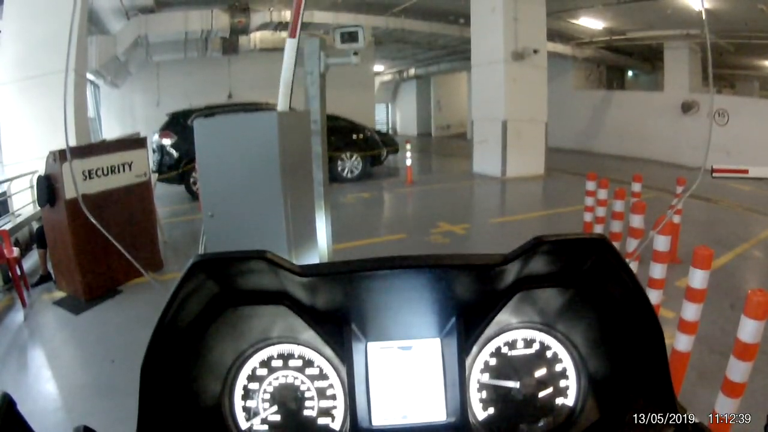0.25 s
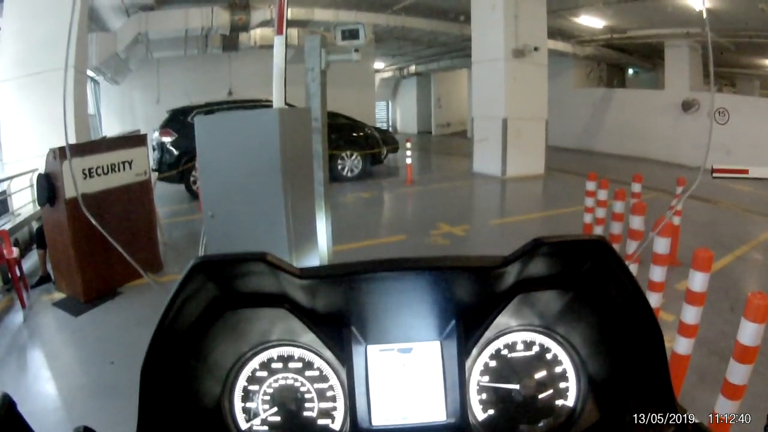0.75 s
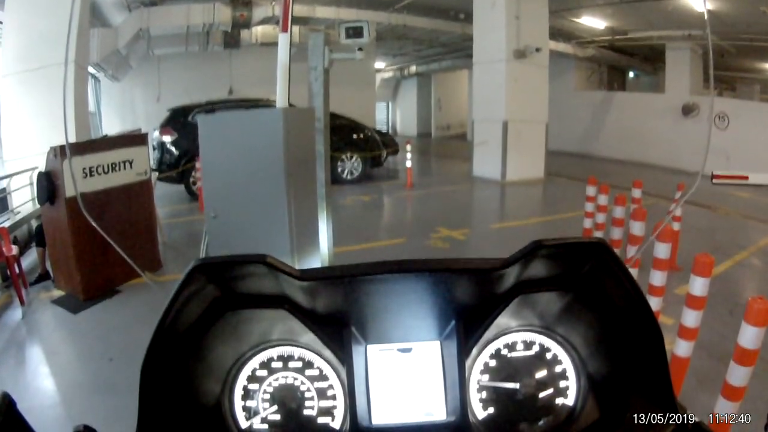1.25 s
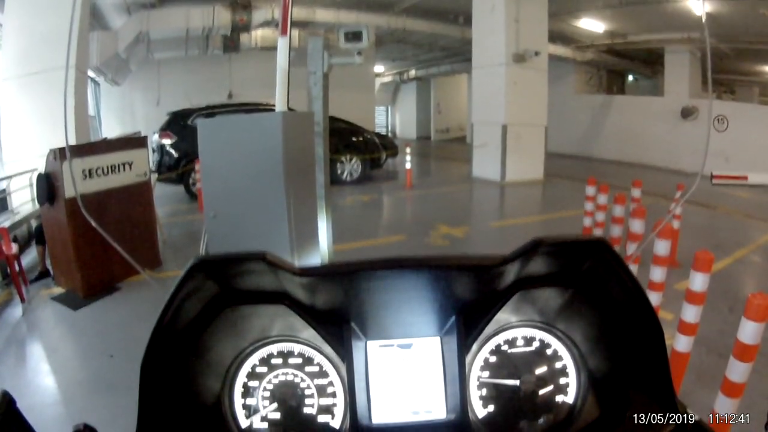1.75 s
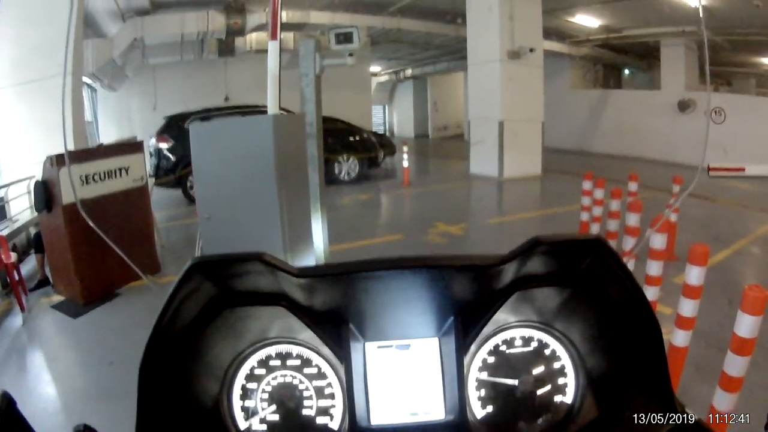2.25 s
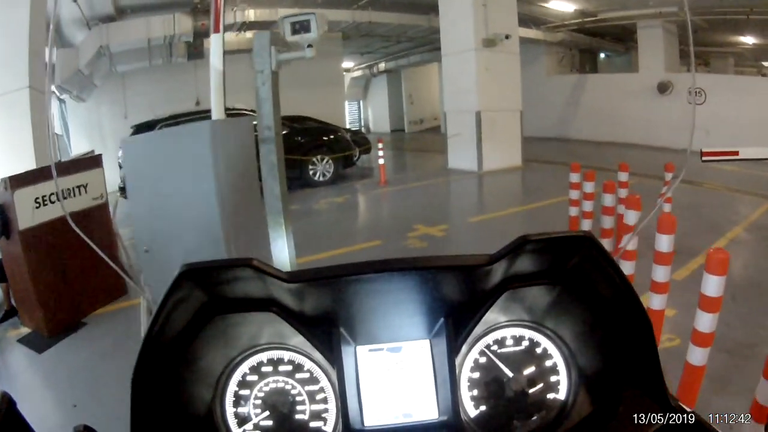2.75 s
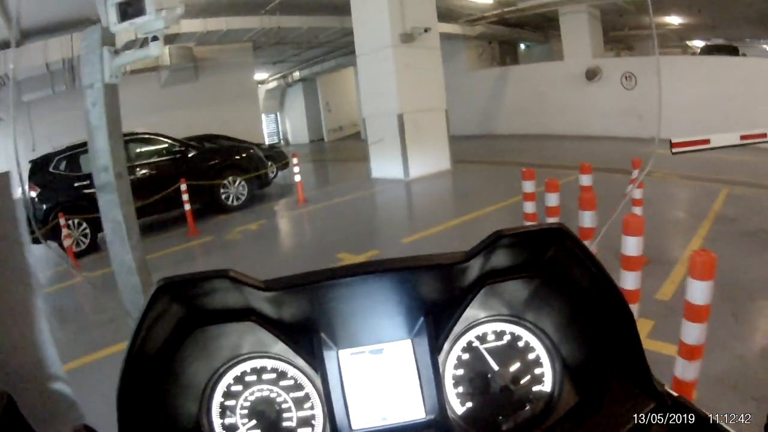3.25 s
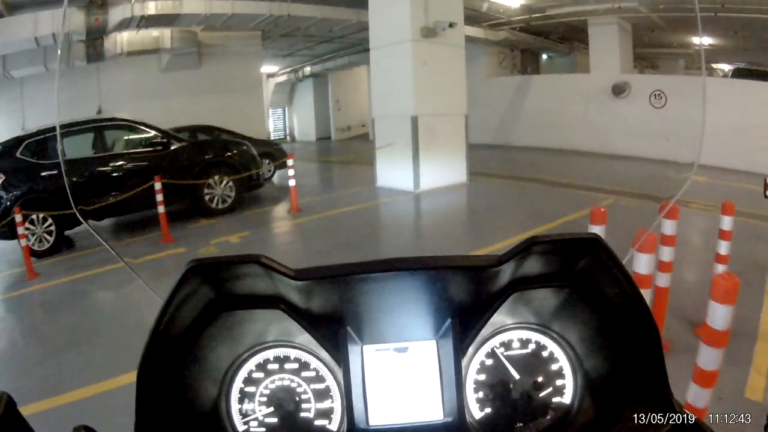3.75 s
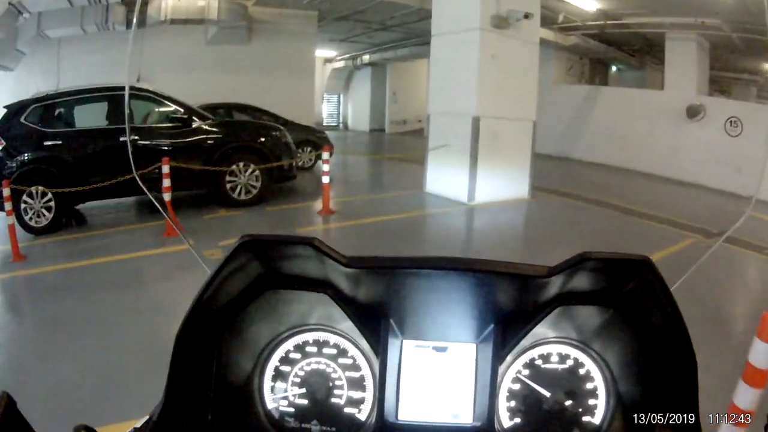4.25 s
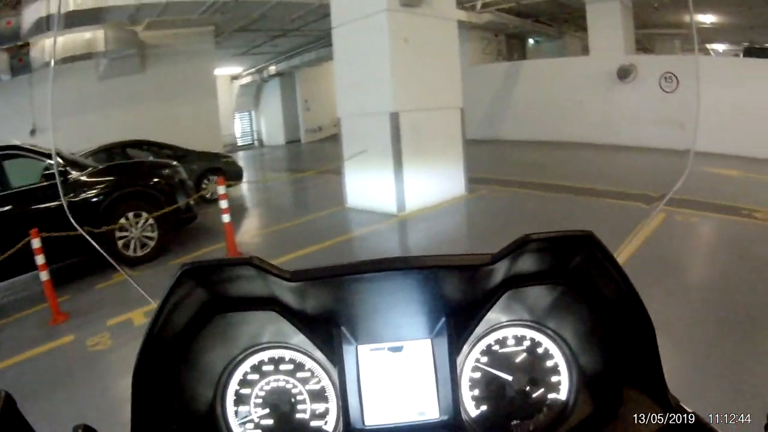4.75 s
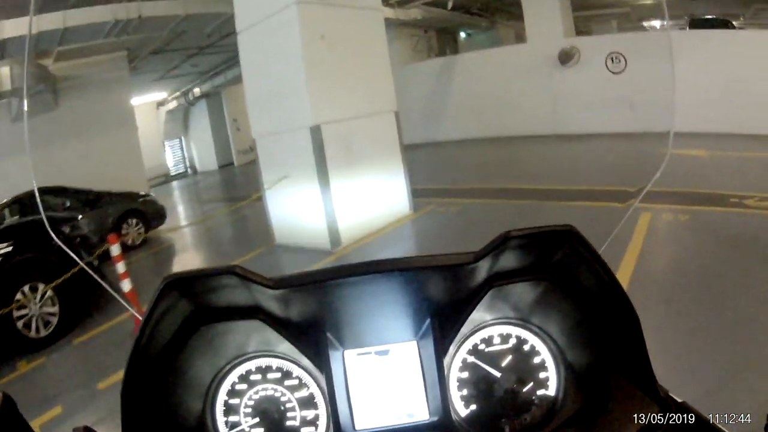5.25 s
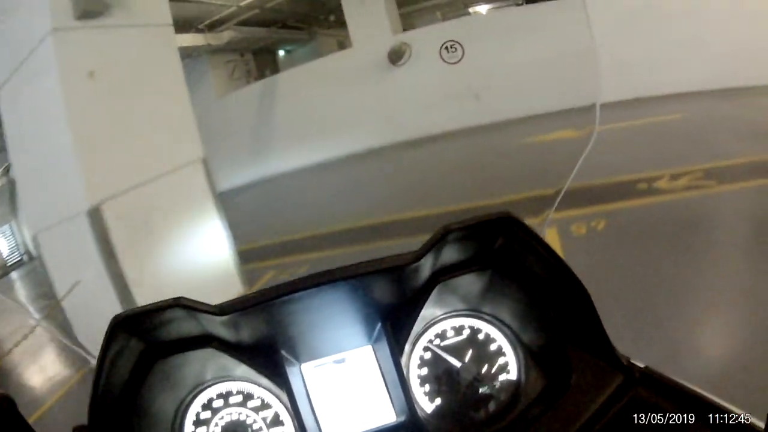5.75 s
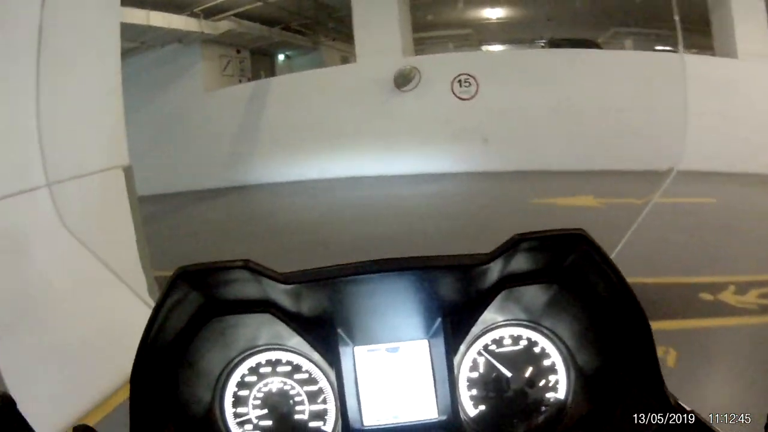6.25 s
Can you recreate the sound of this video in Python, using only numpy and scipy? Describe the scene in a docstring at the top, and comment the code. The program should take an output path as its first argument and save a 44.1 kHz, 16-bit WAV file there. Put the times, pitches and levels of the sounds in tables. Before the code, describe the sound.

Heard from the rider's position, a scooter putters low and bassy in an enclosed concrete garage. A faint motor hum fades, one loud clack strikes, then snapping and clutch chatter lead into a raspy intake drone. The throttle shuts; bumps, rattling trim and tyre rumble continue. A quick fluttering squeal of brakes precedes another brief pull, and the engine slows to coast at the end.

```python
"""An idling motor scooter throbs at a barrier in a concrete car park while the barrier's motor hums and fades.
The scooter pulls away, coasts with a short beating brake squeal, picks up again and ends coasting.
Throb and thumps follow tables of engine speed and strength; the intake is a set of firing harmonics with noise bursts.
Damped modes make the knocks of the plastic fairing, sliding sines the brake squeal and shaped noise the tyres,
belt and clatter; the hall answers with a dull tail of decaying noise over a faint hiss."""
import sys
import numpy as np
from scipy import signal
from scipy.fft import rfft, irfft, next_fast_len
from scipy.io import wavfile
from scipy.ndimage import map_coordinates

SR = 44100
rng = np.random.default_rng(int(sys.argv[2]) if len(sys.argv) > 2 else 0)


def digitize_waveform(pressure):
    """Quantize a signal to 16-bit integers and store it at the path in sys.argv[1].

    Rows of a 2-D input are taken as channels; values are limited to [-1, 1].
    """
    field = np.atleast_2d(pressure).T
    bounded = np.clip(field, -1, 1)
    quanta = np.round(bounded * 32767).astype(np.int16)
    wavfile.write(sys.argv[1], SR, quanta)


N = 286650


def amp(db):
    """Decibels to gain."""
    return 10 ** (np.asarray(db) / 20)


def unit(x):
    """Scale to rms 1."""
    return x / np.sqrt(np.mean(x ** 2) + 1e-20)


def along(points, hz):
    """Read a table of frequency and value on a log frequency axis."""
    f, v = np.transpose(points)
    return np.interp(np.log(hz + 1), np.log(f + 1), v)


def curves(rows):
    """One value per sample for each column after the time."""
    s, *cols = np.transpose(rows)
    return [np.interp(np.arange(N) / SR, s, c) for c in cols]


def wobble(rate):
    """A smooth random curve, rate knots a second."""
    knots = rng.standard_normal(int(N * rate / SR) + 4)
    return map_coordinates(knots, [np.arange(N) * rate / SR])


def swell(s, rise, fall):
    """A rounded rise to 1 at time s, then an exponential fall."""
    t = np.arange(N) / SR - s
    return np.exp(-(np.minimum(t, 0) / rise) ** 2 - np.maximum(t, 0) / fall)


def response(points, size=8192):
    """Causal (minimum-phase) impulse response with the given spectrum."""
    gains = amp(along(points, np.fft.rfftfreq(size, 1 / SR)))
    cepstrum = irfft(np.log(gains))
    cepstrum[1:size // 2] *= 2
    cepstrum[size // 2 + 1:] = 0
    return irfft(np.exp(rfft(cepstrum)))


def colour(x, points):
    """Pass x through a body with the given spectrum."""
    return signal.fftconvolve(x, response(points))[:len(x)]


def noise(points):
    """Coloured noise of rms 1."""
    return unit(colour(rng.standard_normal(N), points))


def grains(points, per_s, scatter_db):
    """Tiny contacts at random moments, coloured by a body; rms 1."""
    moments = rng.random(N) < per_s / SR
    signs = rng.choice([-1, 1], N)
    strengths = amp(scatter_db * np.clip(rng.standard_normal(N), -2, 2))
    return unit(colour(moments * signs * strengths, points))


def pulses(turns, scatter_db, alternate_db):
    """One impulse at each whole turn, alternately raised and lowered by alternate_db."""
    at = np.flatnonzero(np.diff(np.floor(turns)) > 0)
    alternation = alternate_db * (-1) ** np.arange(len(at))
    train = np.zeros(N)
    train[at] = amp(scatter_db * rng.standard_normal(len(at)) + alternation)
    return train


def struck(train, points):
    """Each impulse becomes a short pulse of the same height."""
    shape = response(points)
    return signal.fftconvolve(train, shape / np.abs(shape).max())[:N]


def gate(turns, lag, depth_db):
    """A swell once per firing; rms 1."""
    return unit(amp(depth_db * np.cos(2 * np.pi * (turns - lag))))


# Engine speed. Each row: time in seconds, firings per second.
ENGINE_SPEED = [(0.0, 28.352), (0.46, 28.571), (0.72, 27.336), (0.98, 28.833), (1.28, 27.2), (1.44, 27.447),
                (1.78, 29.948), (1.95, 28.986), (2.15, 32.0), (2.25, 27.194), (2.5, 34.6), (3.25, 33.065),
                (3.52, 29.6), (3.68, 21.8), (3.85, 19.3), (4.1, 19.0), (4.3, 22.1), (4.55, 23.6),
                (4.9, 24.4), (5.04, 26.2), (5.21, 30.79), (5.62, 29.746), (5.85, 29.973), (6.0, 24.5),
                (6.2, 21.5), (6.5, 19.3)]


def firing_rate():
    """Firings per second at every sample."""
    return curves(ENGINE_SPEED)[0]


# Intake loudness, which also stands for the throttle. Each row: time in seconds, level in dB.
INTAKE_LEVEL = [(0, -70), (1.55, -67), (2.05, -46), (2.3, -38), (2.48, -34.5), (3.25, -35.5), (3.65, -46.5),
                (4.9, -52), (5.25, -44), (5.8, -49.5), (6.5, -50)]
FULL_INTAKE_DB = -35  # counted as full throttle


def intake_db():
    """Intake level at every sample."""
    return curves(INTAKE_LEVEL)[0]


def effort_db():
    """Intake level relative to full throttle."""
    return intake_db() - FULL_INTAKE_DB


# Road speed. Each row: time in seconds, speed, where about 1 is the fastest.
ROAD_SPEED = [(2.05, 0), (3.3, 0.58), (4.7, 0.79), (5.6, 1.07), (6.5, 0.27)]


def road_speed():
    """Relative road speed at every sample."""
    return curves(ROAD_SPEED)[0]


# Strength of the firing thumps. Each row: time in seconds, peak in dB before scatter and stumbles.
THUMP_LEVEL = [(0, -23.5), (.5, -26.5), (.75, -28), (1.2, -30), (1.8, -16.5), (2.08, -15), (2.13, -21.5),
               (2.35, -20.5), (2.5, -43), (3.27, -40.5), (3.33, -27), (3.4, -24.5), (3.58, -49),
               (5.35, -53), (5.7, -20), (5.82, -21), (5.91, -44)]
# Shut throttle. Each row: time in seconds, degree of coasting from 0 to 1.
COASTING = [(3.52, 0.14), (3.66, 0.72), (5.08, 1), (5.17, 0), (5.85, 0.32), (5.95, 0.83)]
# The beat falters briefly. Each row: time in seconds, half length in seconds, thump change in dB,
# throb change in dB.
STUMBLES = [(0.4, 0.033, -12.5, 0), (2.142, 0.033, -8.5, -5.5), (2.54, 0.051, -1, -11),
            (3.042, 0.054, 1.5, -4.5), (3.3, 0.067, -5.5, -1), (5.292, 0.026, 0.5, -3)]
# Exhaust puff of a thump. Each row: frequency in Hz, level in dB.
PUFF_SPECTRUM = [(20, -27), (70, -4.5), (130, -0.5), (250, 3), (370, 1), (470, -3.5), (580, -24.5),
                 (760, -16.5), (1000, -30.5), (1500, -49.5), (3000, -67), (8000, -95.5)]
# Hard edge of a firing. Each row: frequency in Hz, level in dB.
SLAP_SPECTRUM = [(200, -32), (550, -6.5), (800, 4), (1050, -5), (1400, -24), (3000, -58)]
IDLE_THUMP_DB = -28
# a "grows" setting is dB per dB of thump above idle
BOOM_HZ, BOOM_WIDTH_HZ = 29.9, 2.37  # the throb is strongest near this firing rate
THROB_DB, THROB_GROWS, THROB_COAST_DB = -19.5, 0.2, -12  # at the boom; growth; change when coasting
THROB_WAVER_DB, COAST_WAVER_DB = .6, 1.5  # unsteadiness; extra when coasting
OCTAVE_DB, OCTAVE_GROWS, OCTAVE_FULL_DB = -45, 0.51, -42  # at idle; growth; part that follows throttle
# coasting, the octave swells as it sinks to the frame's resonance
OCTAVE_PEAK_HZ, OCTAVE_WIDTH_HZ, OCTAVE_COAST_DB = 35, 4.5, -31
THIRD_COAST_DB = -57  # third harmonic when coasting
JITTER_TURNS = 0.0091  # firings come slightly early or late
REBOUND_DB = -15  # a weaker opposite thump about half a cycle after each firing
SLAP_DB, SLAP_GROWS = -51.5, 1.56  # at idle; growth


def exhaust(turns):
    """The silencer leaves a deep throb, booming near one rate, with a suction thump before each trough."""
    rate, thump_db, coasting = firing_rate(), curves(THUMP_LEVEL)[0], curves(COASTING)[0]
    waver_db = (THROB_WAVER_DB + COAST_WAVER_DB * coasting) * wobble(9)
    for s, half, thump_change_db, throb_change_db in STUMBLES:
        stumble = np.exp(-((np.arange(N) / SR - s) / half) ** 4)
        thump_db = thump_db + thump_change_db * stumble
        waver_db = waver_db + throb_change_db * stumble
    load_db = thump_db - IDLE_THUMP_DB

    boom = 1 / np.hypot(1, (rate - BOOM_HZ) / BOOM_WIDTH_HZ)
    first = boom * amp(THROB_DB + THROB_GROWS * load_db + THROB_COAST_DB * coasting + waver_db)
    resonance = 1 / np.hypot(1, (2 * rate - OCTAVE_PEAK_HZ) / OCTAVE_WIDTH_HZ)
    second = amp(OCTAVE_DB + OCTAVE_GROWS * load_db)
    second = second + coasting * amp(OCTAVE_COAST_DB + waver_db) * resonance
    second = np.hypot(second, amp(OCTAVE_FULL_DB + effort_db()))
    third = coasting * amp(THIRD_COAST_DB + COAST_WAVER_DB * wobble(7.1))
    angle = 2 * np.pi * turns
    throb = second * np.cos(2 * angle + 0.62) - first * np.cos(angle - .63) + third * np.cos(3 * angle)
    throb = np.sqrt(2) * throb

    firings = pulses(turns + .05 + JITTER_TURNS * wobble(25), scatter_db=1.0, alternate_db=0)
    rebounds = pulses(turns - .41, scatter_db=0.0, alternate_db=3)
    thump = amp(thump_db) * struck(amp(REBOUND_DB) * rebounds - firings, PUFF_SPECTRUM)
    slap = amp(SLAP_DB + SLAP_GROWS * load_db) * struck(firings, SLAP_SPECTRUM)
    return throb + thump - slap + amp(-19.5) * hall(thump)


# Airbox resonances. Each row: frequency in Hz, level in dB.
AIRBOX = [(34, -29.5), (68, -9.5), (102, -7.5), (136, 1.5), (170, 2.5), (204, -5.5), (238, 3.5), (272, 2),
          (340, -9.5), (470, 1.5), (560, -5.5), (660, -11.5), (780, -25), (950, -10), (1080, -7.5),
          (1250, -7.5), (1500, -21), (2400, -36)]
# Noise of the rushing air. Each row: frequency in Hz, level in dB.
RASP_SPECTRUM = [(200, -34.5), (480, 3.5), (640, -4), (800, -12), (1050, 5), (1230, 0.5), (1500, -10),
                 (1850, -7.5), (2300, -21), (2800, -27.5), (3500, -24), (5000, -37), (7000, -38.5),
                 (8000, -59)]
RASP_FROM_HZ, RASP_DB = 850, -15  # harmonics above this swell with each gulp; rasp against the drone
GULP_RISE_S, GULP_FLOOR, GULP_SCATTER_TURNS = .004, .65, .02
INTAKE_ECHO = .2  # share of the roar that comes back from the concrete


def gulps(turns, lag, scatter_db):
    """A burst per firing that rises fast and dies away, each of its own strength; rms 1."""
    u = np.arange(SR // 20) / SR / GULP_RISE_S
    bursts = signal.fftconvolve(pulses(turns - lag, scatter_db, alternate_db=-6), u * np.exp(1 - u))[:N]
    return unit(GULP_FLOOR + bursts)


def intake(turns, count=44):
    """Fixed airbox resonances pick out harmonics of the firing rate; each gulp of air barks and rasps."""
    rate, drone = firing_rate(), np.zeros(N)
    gulp = gulps(turns + GULP_SCATTER_TURNS * wobble(30), lag=-.02, scatter_db=3.3)
    for k in range(3, count):
        upper = k * rate.max() > RASP_FROM_HZ
        # reflections spread each gulp over the cycle
        smear = 2 * rng.standard_normal() + (.35 * wobble(8) if upper else .06 * wobble(5))
        level = amp(along(AIRBOX, k * rate) + 0.91 * wobble(4.05))
        line = level * np.cos(2 * np.pi * k * turns + smear)
        drone += line * (gulp if upper else 1)
    rasp = amp(RASP_DB) * noise(RASP_SPECTRUM) * gulp * amp(2.5 * wobble(110))
    roar = unit(drone) + rasp
    return amp(intake_db()) * unit(roar + INTAKE_ECHO * hall(roar))


# Tappet patter. Each row: frequency in Hz, level in dB.
TAPPET_SPECTRUM = [(1200, -43), (2000, 5), (2350, -8.5), (2650, -24), (3300, -26.5), (4100, -22),
                   (5000, -22), (9000, -55.5)]
# Dry valve tick. Each row: frequency in Hz, level in dB.
TICK_SPECTRUM = [(100, -35), (400, 13.5), (900, 14), (1400, -18.5), (2000, 7.5), (2700, -8.5), (3400, -10),
                 (4500, -29), (7000, -42.5), (8500, -56.5)]
# Spells of ticks under load. Each row: start in seconds, end in seconds, peak in dB before scatter.
TICK_SPELLS = [(1.74, 1.835, -31.5), (1.84, 2.105, -26.5)]
TAPPET_DB, TAPPET_GROWS = -64.5, 0.37  # at full throttle; dB per dB of intake


def valves(turns):
    """Tappets patter once a cycle, louder with the throttle; dry ticks join as the drive takes up load."""
    level = amp(TAPPET_DB + TAPPET_GROWS * effort_db())
    patter = level * noise(TAPPET_SPECTRUM) * gate(turns, lag=0.57, depth_db=3.5)
    t = np.arange(N) / SR
    strength = sum(amp(db) * ((t > start) & (t < end)) for start, end, db in TICK_SPELLS)
    ticks = pulses(turns - .42, scatter_db=.5, alternate_db=.6)
    return patter + struck(strength * ticks, TICK_SPECTRUM)


CAM_HZ, CAM_RING_S, CAM_DB = 2304, 0.054, -59.5  # pitch; t60; level before scatter


def cam(turns):
    """A light metal tick that rings briefly on every second firing."""
    t = np.arange(SR // 8) / SR
    ring = amp(-60 * t / CAM_RING_S) * np.sin(2 * np.pi * CAM_HZ * t)
    strikes = pulses(turns / 2 - .15, scatter_db=1.5, alternate_db=0.0)
    return amp(CAM_DB) * signal.fftconvolve(strikes, ring)[:N]


# The clutch biting. Each row: frequency in Hz, level in dB.
CLUTCH_SPECTRUM = [(1200, -25.5), (1600, -13), (1870, 6.5), (2100, -13), (2350, -2), (2700, -25.5),
                   (5000, -53), (8000, -74)]
CHATTER_AT_S, CHATTER_RISE_S, CHATTER_FALL_S, CHATTER_DB = 2.36, .08, 0.28, -49


def clutch(turns):
    """The clutch shoes chatter as they bite: a clump of hard grains in each cycle."""
    clumps = grains(CLUTCH_SPECTRUM, per_s=600, scatter_db=3) * gate(turns, lag=.35, depth_db=7)
    clumps = clumps * amp(2.5 * wobble(35))
    return amp(CHATTER_DB) * swell(CHATTER_AT_S, CHATTER_RISE_S, CHATTER_FALL_S) * clumps


# Body shaken through the drive. Each row: frequency in Hz, level in dB.
BODY_RESONANCES = [(60, -30.5), (88, 0), (105, -18), (150, -14.5), (170, -2), (192, 0.5), (218, -2.5),
                   (250, -12.5), (320, -15.5), (400, -27.5)]
HUM_DB = -42  # peak of a line on a 0 dB resonance at road speed 1


def drive_hum(turns, count=18):
    """On the move, the drive carries engine harmonics into the body; they slide through its resonances."""
    rate, lines = firing_rate(), np.zeros(N)
    for k in range(3, count):
        angle = 2 * np.pi * (k * turns + rng.random()) + .2 * wobble(6)
        lines += amp(along(BODY_RESONANCES, k * rate)) * np.cos(angle)
    return amp(HUM_DB) * road_speed() ** 2 * lines


# Tyre rumble on the deck. Each row: frequency in Hz, level in dB.
DECK_SPECTRUM = [(20, -20.5), (50, -3.5), (110, -7.5), (190, 2.5), (240, -6), (330, -16), (480, -16),
                 (800, -31.5), (2000, -74.5)]
# Shudder of the frame. Each row: frequency in Hz, level in dB.
FRAME_SPECTRUM = [(15, -23), (25, -8), (34, 4), (42, -3.5), (55, -19.5), (100, -26), (300, -87.5)]
# Rub of belt and brake. Each row: frequency in Hz, level in dB.
RUB_SPECTRUM = [(1000, -38), (1550, -13.5), (1880, 7), (2100, 0.5), (2350, 1), (2650, -21.5), (3100, -19),
                (3330, 5.5), (3600, 0.5), (3850, -17), (4100, -15.5), (4330, -10.5), (4650, -28.5),
                (7500, -40.5), (8200, -63.5)]
# Clatter of engine and drive. Each row: frequency in Hz, level in dB.
CLATTER_SPECTRUM = [(120, -11), (300, 5), (400, -5.5), (520, 0), (580, -7), (660, 4.5), (820, -19.5),
                    (930, -6), (1320, -3), (1560, -15.5), (2250, -18.5), (2600, -42.5), (4000, -30),
                    (7000, -69.5)]
# Jolts through the frame. Each row: time in seconds, half length in seconds, rumble in dB, shudder in dB.
JOLTS = [(0.542, 0.039, -31, -54), (2.211, 0.056, -28.5, -29.5), (2.365, 0.07, -32.5, -40.5),
         (3.4, 0.069, -34.5, -48), (3.865, 0.021, -31.5, -35), (4.136, 0.023, -31.5, -34),
         (5.117, 0.048, -37.5, -52)]
# Clutch and brake rubs. Each row: time in seconds, rise in seconds, fall in seconds, rub in dB,
# clatter in dB.
RUBS = [(2.31, 0.15, 0.32, -55, -41), (4.03, 0.078, 0.18, -55.5, -45.5), (4.155, 0.027, 0.04, -48, -41),
        (5.02, 0.26, 0.24, -61, -44.5), (5.42, 0.09, 0.034, -62, -47.5)]
# levels at rest, then levels added at road speed 1
DECK_STANDING_DB, DECK_ROLLING_DB = -47.5, -41
FRAME_STANDING_DB, FRAME_ROLLING_DB = -47.5, -47
BELT_STANDING_DB, BELT_ROLLING_DB = -75, -77
# engine clatter at full throttle; dB per dB of intake; drive clatter added at road speed 1
CLATTER_DB, CLATTER_GROWS, CLATTER_ROLLING_DB = -46, 0.22, -52.5


def rolling(standing_db, rolling_db):
    """A standing gain joined in power by one that grows with the square of road speed."""
    return np.hypot(amp(standing_db), amp(rolling_db) * road_speed() ** 2)


def running(turns):
    """Tyres and frame rumble with speed and jolts; the belt hisses, rubs and clatter pulse in each cycle."""
    deck = rolling(DECK_STANDING_DB, DECK_ROLLING_DB)
    frame = rolling(FRAME_STANDING_DB, FRAME_ROLLING_DB)
    belt = rolling(BELT_STANDING_DB, BELT_ROLLING_DB)
    clatter = rolling(CLATTER_DB + CLATTER_GROWS * effort_db(), CLATTER_ROLLING_DB)
    rub = 0
    for s, half, rumble_db, shudder_db in JOLTS:
        jolt = swell(s, half, half)
        deck = np.hypot(deck, amp(rumble_db) * jolt)
        frame = np.hypot(frame, amp(shudder_db) * jolt)
    for s, rise, fall, rub_db, clatter_db in RUBS:
        grip = swell(s, rise, fall)
        rub = np.hypot(rub, amp(rub_db) * grip)
        clatter = np.hypot(clatter, amp(clatter_db) * grip)
    rumble = deck * amp(2.1 * wobble(14)) * noise(DECK_SPECTRUM)
    shudder = frame * noise(FRAME_SPECTRUM)
    grit = grains(RUB_SPECTRUM, per_s=1400, scatter_db=3) * gate(turns, lag=.28, depth_db=7)
    clank = noise(CLATTER_SPECTRUM) * gate(turns, lag=0.071, depth_db=-0.5) * amp(2.5 * wobble(70) - 0.8)
    return rumble + shudder + belt * noise(RUB_SPECTRUM) + rub * grit + clatter * clank


# Loose trim. Each row: frequency in Hz, level in dB.
TRIM_SPECTRUM = [(400, -26.5), (900, -6.5), (1080, -7), (1320, 6.5), (1550, -11), (2200, -17.5),
                 (2700, -38.5), (3450, -21.5), (5000, -43), (8000, -64.5)]
TRIM_DB = -54.5  # at road speed 1


def trim(turns):
    """Loose trim rattles on the move, shaken by each firing."""
    shaken = grains(TRIM_SPECTRUM, per_s=170, scatter_db=3) * gate(turns, lag=.2, depth_db=5)
    return amp(TRIM_DB) * road_speed() * shaken


# The frame rocks on its mounts. Each row: time in seconds, half length in seconds, pitch in Hz, level in dB.
JUDDERS = [(3.715, 0.066, 30.9, -31.5), (3.952, 0.042, 25.7, -25.5), (4.105, 0.044, 27.6, -34),
           (4.855, 0.038, 28.8, -28.5)]


def judder():
    """A few slow cycles of the frame rocking on its mounts."""
    t, out = np.arange(N) / SR, np.zeros(N)
    for s, half, hz, db in JUDDERS:
        out += amp(db) * swell(s, half, half) * np.cos(2 * np.pi * hz * (t - s))
    return np.sqrt(2) * out


# Fairing knocks. Each row: time in seconds, thud in dB, clack in dB, crack in dB, tick in dB,
# hard edge in dB relative to the tick. These tilt the spectrum of the ring and rattle.
KNOCKS = [(.467, -57, -35, -37.5, -57, 5), (.506, -64, -32.5, -40, -45, 24),
          (.5085, -53, -29, -37, -47.5, 13.5), (.5155, -56, -28.5, -32.5, -50, 11),
          (0.52, -44, -36, -31, -47, 17), (0.5249, -14.5, -33, -33.5, -45.5, 14),
          (1.664, -55, -39, -40.5, -58, -8), (1.694, -49, -43.5, -34, -22, 0.5),
          (1.7164, -4, -12.5, -16, -10, -5), (1.7245, -16, -14, -25, -19.5, 1),
          (1.7288, -13, -15.5, -22, -22.5, -11), (1.735, -26.5, -21, -28.5, -36, 2),
          (2.209, -39, -29.5, -31, -55, 6), (2.2449, -41.5, -28, -26, -45, 6),
          (3.6491, -40, -35, -56, -58, -8), (3.851, -27, -42, -47, -47, 1),
          (3.886, -30, -37.5, -42, -33, -2), (3.916, -17, -40.5, -46, -45, 10),
          (4.115, -12.5, -32, -29, -42.5, 4.5), (4.137, -20, -39, -44, -32, -14),
          (4.149, -30.5, -34, -30, -34, -12), (4.25, -55, -30.5, -31, -32.5, 7),
          (4.255, -56, -32.5, -22.5, -40.5, 19.5), (4.838, -50, -35, -38, -54.5, -3.5),
          (5.075, -13.5, -33.5, -37, -42, 12), (5.295, -48, -34.5, -25, -32.5, 9),
          (5.544, -13.5, -41, -54, -62, -8), (5.636, -49, -34.5, -36, -57, -1),
          (5.961, -51, -38.5, -35, -47, 0)]
# Fairing modes. Each row: frequency in Hz, level in dB.
FAIRING_MODES = [(190, -11.5), (290, -6), (410, 1), (522, 5.5), (661, -1.5), (742, -8.5), (890, -4),
                 (1038, 0), (1250, 1), (1378, -1.5), (1560, -5.5), (1760, -12), (1879, -7.5), (2334, -8),
                 (3130, -9), (3338, -3), (3590, -6), (4280, -25.5), (6600, -35.5), (7300, -33.5)]
# Rattle of the shell. Each row: frequency in Hz, level in dB.
SHELL_SPECTRUM = [(60, 10), (180, -5.5), (450, 10.5), (800, 7.5), (1300, -8.5), (1800, -11.5), (2300, 1),
                  (2750, -11.5), (3350, -21), (4200, -8.5), (5200, -28), (7400, -34.5), (8000, -45),
                  (14000, -63)]
RING_S, RING_FALLS = 0.046, 0.36  # t60 at 1 kHz; higher modes die sooner, by this power of their pitch


def panel_decay(t, hz):
    """Exponential decay of a panel mode at hz."""
    return amp(-60 * t / RING_S * (hz / 1000) ** RING_FALLS)


def knocks():
    """Loose plastic panels strike: damped modes and a short rattle, soft or sharp by the contact."""
    out, t = np.zeros(N + SR), np.arange(SR // 4) / SR
    for s, thud_db, clack_db, crack_db, tick_db, edge_db in KNOCKS:
        ring = np.zeros(len(t))
        for k, (hz, db) in enumerate(FAIRING_MODES):
            mode = panel_decay(t, hz) * np.sin(2 * np.pi * hz * t)
            ring += amp(db + rng.normal(0, 1.0)) * mode * (-1) ** k
        rattle = panel_decay(t, 2000) * unit(colour(rng.standard_normal(len(t)), SHELL_SPECTRUM))
        contact = [(80, thud_db - 0.5), (280, thud_db), (600, clack_db), (1200, clack_db),
                   (2000, crack_db), (3300, tick_db), (6500, tick_db + edge_db)]
        out[round(s * SR):][:len(t)] += colour(0.46 * ring + .5 * rattle, contact)
    return out[:N]


BUZZ_DB, BUZZ_S = -27.5, 0.042  # gain on the vibration; t60


def buzz(x):
    """The fairing's modes ring along with the vibration x."""
    t = np.arange(SR // 4) / SR
    modes = sum(amp(db) * np.cos(2 * np.pi * hz * t) for hz, db in FAIRING_MODES)
    ring = modes * 1000 ** (-t / BUZZ_S)
    return amp(BUZZ_DB) * signal.fftconvolve(x, ring / np.linalg.norm(ring))[:N]


# Snaps as the drive takes up its slack. Each row: time in seconds, peak in dB, hard edge in dB above 4 kHz.
SNAPS = [(2.17, -38.5, 11), (2.186, -44, 7.5), (2.209, -31.5, 10), (2.219, -27, 2.5), (2.246, -23, 6.5),
         (2.256, -30.5, 4), (2.327, -35, -1), (2.347, -37, 9), (2.359, -28, -1.5)]
# Body of a snap. Each row: frequency in Hz, level in dB.
SNAP_SPECTRUM = [(300, -21.5), (1000, 0), (1600, 4.5), (2100, 3.5), (2800, -10), (3600, -16), (4800, -26.5),
                 (7000, -36), (8000, -56)]


def snaps():
    """Hard, dry contacts in the drive that hardly ring."""
    out = np.zeros(N + SR)
    for s, db, edge_db in SNAPS:
        click = response([(hz, level + edge_db * (hz > 4000)) for hz, level in SNAP_SPECTRUM])
        out[round(s * SR):][:len(click)] += amp(db) * click / np.abs(click).max()
    return out[:N]


def squeal(hz, grip, octave_db, waver):
    """The pad sticks and slips on a disc mode, with an unsteady pitch and level."""
    angle = 2 * np.pi * np.cumsum(hz * (1 + waver * wobble(260))) / SR
    return grip * amp(wobble(150)) * (np.sin(angle) + amp(octave_db) * np.sin(2 * angle))


# Quick beats of squeal. Each row: start in seconds, end in seconds, middle pitch in Hz, level in dB,
# octave in dB relative to the pitch.
SQUEAL_BEATS = [(4.882, 4.91, 1840, -48, -20), (4.907, 4.939, 1880, -42, -21),
                (4.91, 4.952, 2355, -38.5, -38), (4.946, 4.983, 1875, -28.5, -19),
                (4.981, 5.025, 1883, -30, -19), (5.018, 5.06, 1864, -27.5, -16),
                (5.054, 5.086, 1852, -29.5, -16), (5.08, 5.112, 1835, -34.5, -37),
                (4.96, 5.04, 2320, -53, -44)]
# Short rough squeaks. Each row: time in seconds, half length in seconds, pitch in Hz, level in dB.
SQUEAKS = [(2.3, .04, 2300, -55), (2.385, 0.026, 3490, -51.5), (2.576, 0.013, 2350, -46.5),
           (4.032, 0.077, 4300, -60), (4.147, 0.023, 4340, -49.5), (4.163, 0.034, 3350, -43.5),
           (4.782, .03, 2440, -59), (4.8, .015, 4800, -68), (5.135, 0.04, 2440, -51),
           (5.157, .01, 3440, -55.5), (5.391, .025, 1845, -45.5), (5.429, 0.014, 1860, -41),
           (5.461, .025, 1856, -46), (5.386, .012, 3620, -63), (5.421, .012, 3600, -57.5),
           (5.454, 0.013, 3520, -55.5)]
SQUEAL_ROUNDNESS, SQUEAL_SAG_HZ_PER_S = 1, 480  # power of the half-sine beat; fall of its pitch


def brake():
    """Beats of squeal, each swelling and sagging in pitch, among short rough squeaks."""
    out, t = np.zeros(N), np.arange(N) / SR
    for start, end, hz, db, octave_db in SQUEAL_BEATS:
        u = np.clip((t - start) / (end - start), 0, 1)
        grip = amp(db) * np.abs(np.sin(np.pi * u)) ** SQUEAL_ROUNDNESS
        pitch = hz - SQUEAL_SAG_HZ_PER_S * (u - .5) * (end - start)
        out += squeal(pitch, grip, octave_db=octave_db, waver=.005)
    for s, half, hz, db in SQUEAKS:
        away = np.abs(t - s) / half
        grip = (away < 1) * amp(db - 18.0 * away)
        out += squeal(hz, grip, octave_db=-40, waver=0.043)
    return out


BARRIER_HZ, BARRIER_DB, BARRIER_STOP_S, BARRIER_FADE_S = 233.7, -47.5, .36, .15


def barrier():
    """The motor that lifts the barrier arm hums unsteadily and fades as the arm reaches the top."""
    t = np.arange(N) / SR
    driving = np.clip(1 - (t - BARRIER_STOP_S) / BARRIER_FADE_S, 0, 1)
    hum = np.sin(2 * np.pi * BARRIER_HZ * t + 0.64 * wobble(9.1))
    return amp(BARRIER_DB + 1.5 * wobble(15)) * driving * hum


# Decay of the hall. Each row: frequency in Hz, t60 in seconds.
HALL_DECAY = [(100, 1.9), (500, 1.8), (2000, 0.22), (8000, 0.035)]


def hall(x):
    """Concrete floor and ceiling answer after about 11 ms with a dull tail, cut at about a second."""
    hz, t, z = signal.stft(rng.standard_normal(SR), SR, nperseg=256)
    decay = amp(-60 * t / along(HALL_DECAY, hz)[:, None])
    tail = signal.istft(z * decay, SR, nperseg=256)[1]
    return signal.fftconvolve(np.pad(x, (500, 0)), tail / np.linalg.norm(tail))[:N]


# Faint steady hiss. Each row: frequency in Hz, level in dB.
HISS_SPECTRUM = [(100, 6.5), (2300, -3.5), (2800, -3.5), (3700, -13), (4200, 2), (4600, -10.5), (5600, -17),
                 (7000, -15.5), (7900, -21.5), (15500, -20.5)]


def scene():
    """Everything on the scooter, the barrier, the hall's answer and a faint steady hiss."""
    turns = np.cumsum(firing_rate()) / SR  # one turn is one firing
    squeaks, panels = brake(), knocks() + snaps()
    machine = valves(turns) + cam(turns) + intake(turns) + clutch(turns)
    machine = machine + drive_hum(turns) + running(turns) + trim(turns)
    scooter = exhaust(turns) + judder() + machine + buzz(machine) + squeaks + panels
    echo = hall(amp(-23) * squeaks + amp(-37) * panels)
    return (scooter + barrier() + echo + amp(-65.5) * noise(HISS_SPECTRUM))[None]


TOP_HZ = 15750


def record(dry):
    """Fade in over 3 ms and keep nothing above the band limit."""
    m = next_fast_len(N + SR // 2)
    fade = np.minimum(np.arange(N) / SR / .003, 1)
    band = np.fft.rfftfreq(m, 1 / SR) < TOP_HZ
    return irfft(rfft(dry * fade, m) * band, m)[..., :N]


dry = scene()
out = record(dry)
digitize_waveform(out)
```